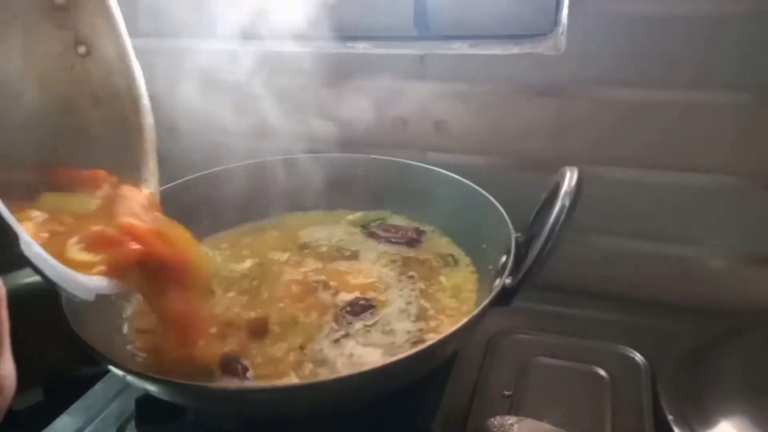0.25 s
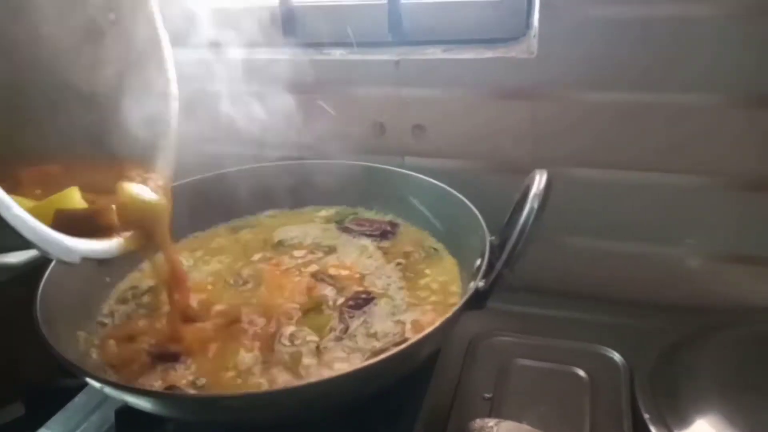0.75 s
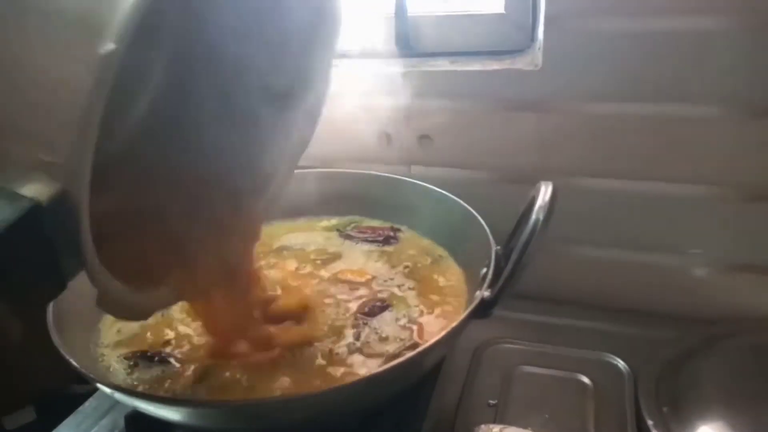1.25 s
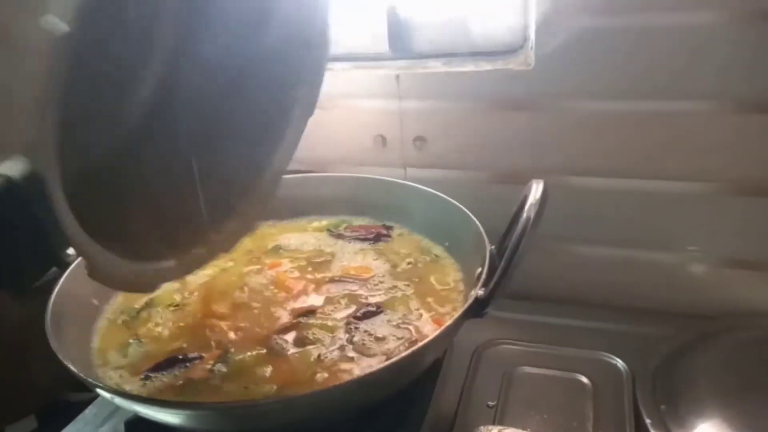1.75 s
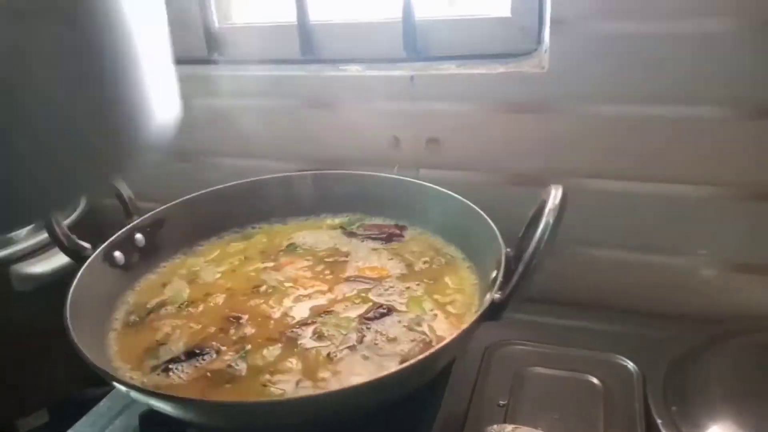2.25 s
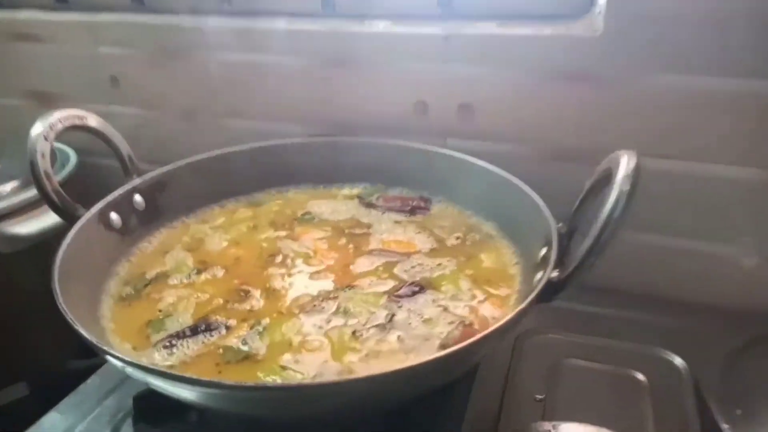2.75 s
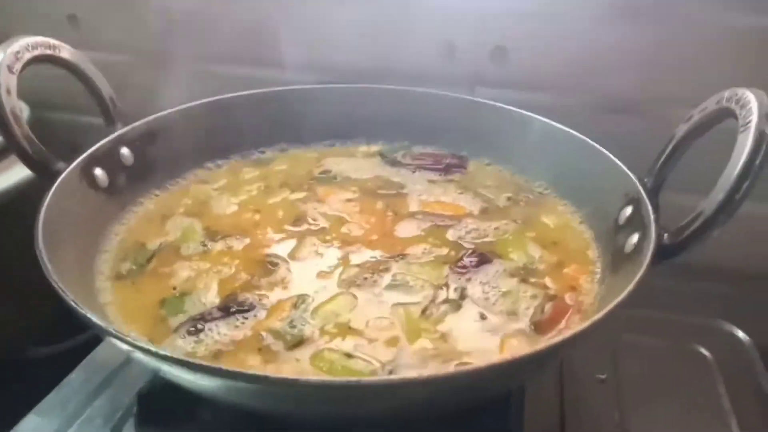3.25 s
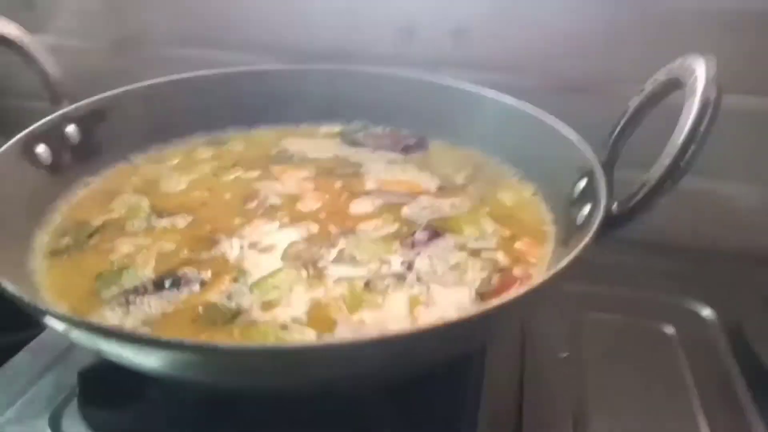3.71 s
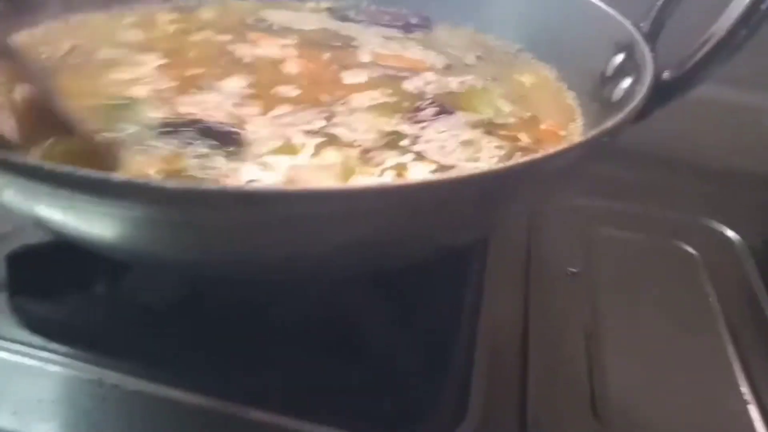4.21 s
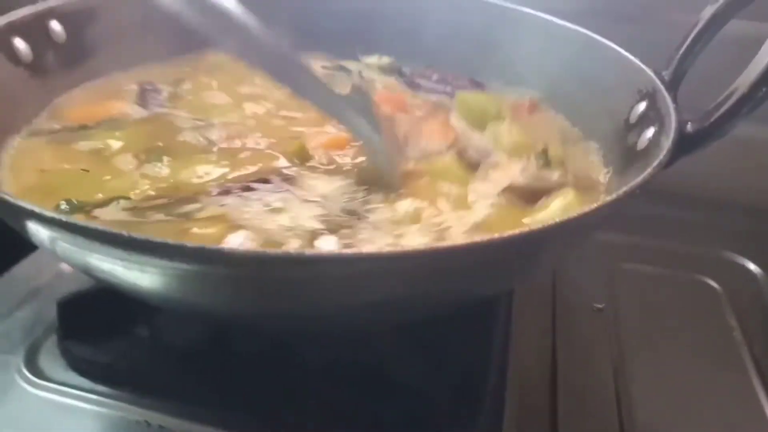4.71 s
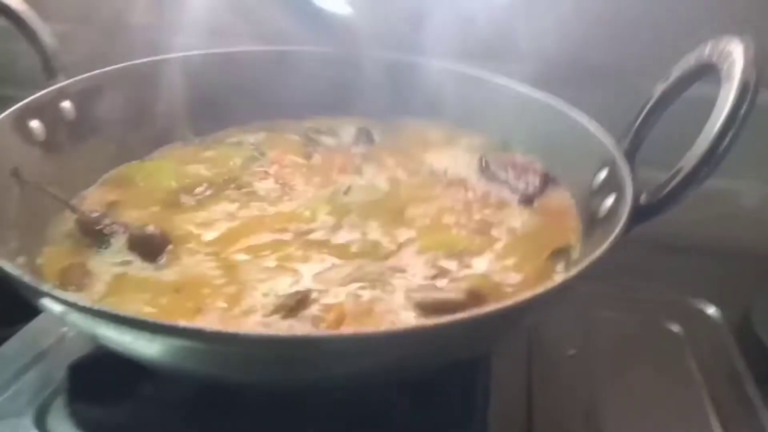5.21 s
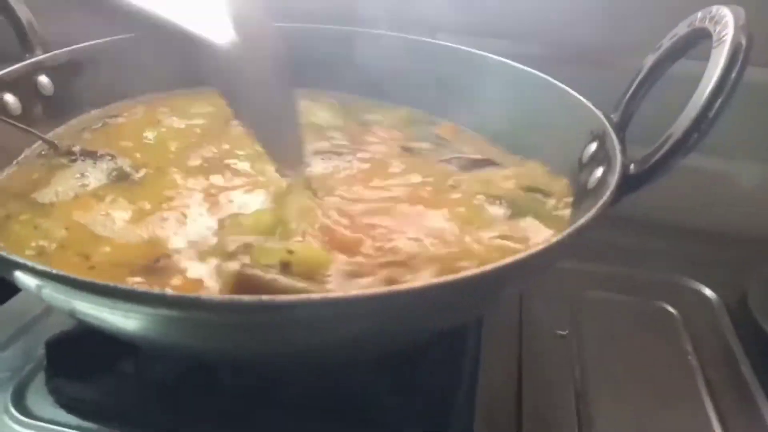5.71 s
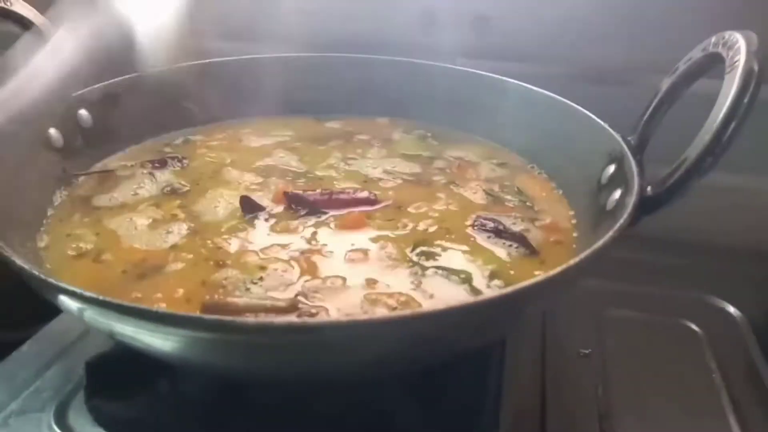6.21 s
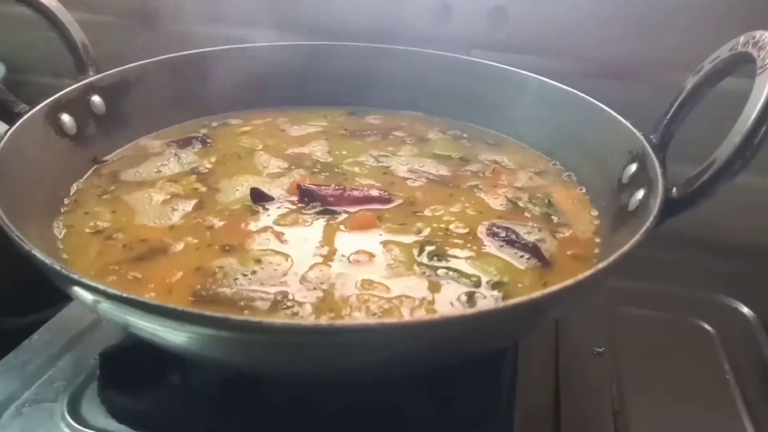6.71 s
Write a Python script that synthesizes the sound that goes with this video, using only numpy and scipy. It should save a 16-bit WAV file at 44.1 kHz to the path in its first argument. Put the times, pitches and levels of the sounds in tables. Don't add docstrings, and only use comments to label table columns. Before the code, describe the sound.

From 0 s a dense, bright sizzle with fine spitting spray surges unevenly as wet food goes into hot oil, swelling near 0.1, 0.55 and 0.9-1.1 s; a light metallic knock sounds at 0.2 s. The frying stays lively to about 1.5 s, then weakens. At 1.86 s the empty pot hits sharply, ringing thinly, with a rough scrape and low counter boom. Assorted metal knocks follow at 2.6-2.8, 3.1, 3.3 and 3.5 s, the last with a short harsh scrape, then a clicky rattle at 3.9 s. From 4.3 to 5.2 s stirring raises softer hissing flares, with dull ladle bumps from 4.6 s and a clearer one at 5.73 s. After 6 s the sizzle almost vanishes, leaving faint simmer, flame rumble and slight humming rubs. Two light ware clinks come at 6.73 and 6.87 s. Close mono phone microphone, small kitchen.

```python
import sys
import numpy as np
from scipy import signal
from scipy.fft import rfft, irfft, next_fast_len
from scipy.io import wavfile

SR = 44100
rng = np.random.default_rng(int(sys.argv[2]) if len(sys.argv) > 2 else 0)


def volts_from_decibels(level):
    exponent = np.asarray(level, float) / 20
    return 10 ** exponent


def wrap_up_sound(samples):
    columns = np.atleast_2d(samples).T
    tamed = np.clip(columns, -1, 1)
    steps = np.round(tamed * 32767).astype(np.int16)
    wavfile.write(sys.argv[1], SR, steps)


N = 306936
TIME_S = np.arange(N) / SR

# pitch_hz, level_db (per Hz); the sizzle has the microphone port's peaks
SIZZLE = [(590, -57.5), (1000, -16), (1060, -39.5), (1130, -15), (1770, -18.5), (2070, -5.5), (2360, -2),
          (3090, -7), (4540, -4.5), (6210, 2.5), (6620, -1.5), (7110, -20.5), (8500, -28.5), (11000, -40.5),
          (18700, -120)]
SPRAY = [(4120, -15.5), (7000, 5.5), (8300, -9.5), (10700, -10.5), (13500, -10), (14200, -6), (14700, 3.5),
         (15700, 1.5), (16400, -9)]
SIMMER = [(88, -30), (150, -5.5), (199, -28), (327, -6.5), (527, -12), (796, -2), (1070, -11), (1380, -11),
          (2000, -2.5), (2600, -9.5), (4400, -120)]
FLAME = [(15, -37), (25, -26), (65, -9), (113, 3), (143, -3.5), (194, -27), (231, -24), (260, -12),
         (340, -27), (570, -120)]
# time_s, level_db
HEAT = [(0, -31.5), (.6, -32), (1.0, -36), (1.1, -33), (1.42, -33), (1.75, -37.5), (2.4, -41), (3.1, -45.5),
        (3.75, -47.5), (4.15, -45), (5.1, -47.5), (5.35, -54.5), (5.55, -57.5), (5.85, -58.5), (6.2, -76.5),
        (6.96, -69)]
# peak_s, level_db, rise_s, fall_s
FLARES = [(.07, -38.5, 0.03, 0.21), (.26, -42, .05, 0.023), (.56, -35, 0.037, 0.17),
          (.87, -36.5, 0.024, 0.076), (1.004, -33.5, 0.01, 0.0072), (1.1, -35, .03, 0.015),
          (4.31, -38, 0.066, 0.098), (4.66, -38.5, .07, 0.11), (4.89, -41.5, 0.092, 0.082),
          (5.2, -47, 0.1, 0.064), (5.74, -54, 0.0098, 0.041)]
# pitch_hz, width_hz, level_db
JUG = (-15.5, 0.45), [(273, 98, 5), (1290, 45, 4.5), (2200, 20, -3), (2440, 17, 0), (2760, 91, -3),
       (3140, 49, -5.5)]
POT_RIM = (-11, 0.8), [(2350, 70, 0), (3463, 38, -3.5), (4590, 51, 1.5), (5490, 62, -0.5), (6040, 45, -7),
           (6154, 70, 3)]
SPOON = (-8, 0.3), [(281, 44, 2), (737, 120, -6), (2016, 57, -6), (2390, 130, -6), (4100, 310, -13),
         (5930, 180, -6)]
BOARD = (-7.5, 0.3), [(280, 31, -1), (613, 56, -5), (1023, 40, -5), (2170, 210, -6), (2332, 33, -2.5),
         (3530, 380, -12), (5500, 260, -8.5), (6270, 390, -17)]
POT_BASE = (-9.5, 0.41), [(510, 66, -1.5), (677, 67, -1), (999, 74, 1.5), (1590, 33, -7), (2303, 34, 1.5),
            (2860, 63, -5.5), (3840, 135, -1), (4380, 84, -7), (5330, 88, -4), (6570, 170, -5)]
SHELF = (-5.5, 0.25), [(104, 31, 4.5), (1460, 85, -6), (1855, 49, -10), (2500, 27, -18), (2940, 23, -20),
         (3600, 170, -14), (4000, 34, -17), (4420, 89, -11)]
TIN = (-4, 0.31), [(210, 50, 6), (950, 27, -11), (1463, 130, -2.5), (2023, 26, -5), (2380, 19, -6),
       (2840, 200, -9), (3130, 110, -8), (3360, 33, -10), (3800, 41, -14), (4300, 74, -9)]
CLIP = (-16.5, 0.14), [(1920, 120, -5.5), (3550, 110, -5), (5160, 230, -5), (6060, 210, -2.5),
        (6300, 100, -16)]
BOWL = (-7, 0.28), [(1210, 65, -3), (1440, 72, -2.5), (1546, 45, 1.5), (1970, 81, -4.5), (2200, 84, -3.5),
        (2820, 45, -26), (3540, 150, -7), (4330, 67, -36), (5490, 65, -16), (6300, 63, -35),
        (7650, 56, -38)]
LID = (-12.5, 0.25), [(256, 32, 1), (1480, 98, -5), (1870, 99, -1.5), (2180, 110, -3.5), (3330, 150, -2.5),
       (4070, 130, -3.5), (4740, 96, -9), (6120, 104, -0.5), (7430, 120, -11)]
STRUCK_S = [
    .214,
    1.857,
    2.615,
    2.759,
    3.110,
    3.281,
    3.479,
    3.904,
    6.734,
    6.872,
]
# start_s, strength_db, weight_db, edge_db
CLATTER = [(0.218, -15.5, -18, -3), (0.361, -23.5, -17.5, 7), (0.4545, -24, -26, -11),
           (1.858, -9.5, -29, -8.5), (1.904, -26, -7, 7), (1.968, -30, -2, 6), (2.023, -35, -5, 5),
           (2.5048, -34.5, -5.5, -5), (2.6128, -19.5, -12, 6.5), (2.688, -27.5, -12, -6),
           (2.7578, -19, -7.5, -1), (2.8204, -27, -33, 1), (3.1097, -18, -13.5, -3),
           (3.281, -22, -18.5, -3), (3.481, -17, -7.5, -2), (3.591, -25.5, -32, -11), (3.6663, -33, -44, 2),
           (3.9027, -26, -17.5, 9), (3.9556, -21.5, -23, -8), (3.997, -36, -24, -13),
           (6.735, -19, -25, -39), (6.8685, -37, -20, 4), (6.8755, -22.5, -11, 4)]
# start_s, hold_s, rumble_db, rasp_db, release_db_per_s
DRAG = [
    (1.892, 0.085, -28.5, -21.5, 98),
    (3.505, 0.018, -36, -14.5, 220),
    (3.585, 0.0084, -50, -44, 300),
    (3.655, 0.023, -64, -50, 250),
]
# start_s, level_db, t60_s
BOOMS = [(2.0, -36.5, 0.65), (2.16, -46.5, 0.7), (3.13, -41, 0.42), (3.3, -51, 1.0), (3.5, -39, 0.55),
         (3.63, -48, 0.36), (3.88, -44, 0.44), (6.74, -41.5, 0.53), (6.88, -47, 1.1)]
# start_s, pitch_hz, level_db, t60_s
PINGS = [
    (2.615, 6514, -32, .45),
    (6.874, 11750, -62, .3),
]
# start_s, clack_db, thud_db, knock_db
LADLE = [(4.5733, -24.5, -34, -34.5), (4.775, -29, -40, -30.5), (4.8324, -31, -40, -39.5),
         (5.1, -33, -34.5, -37.5), (5.1772, -36, -45.5, -43), (5.3368, -46, -45, -40.5),
         (5.3967, -46, -56, -56.5), (5.7303, -27, -36.5, -34), (5.9718, -53, -43.5, -40),
         (6.0384, -54, -52, -48.5), (6.1085, -46, -51, -70)]
# pitch_hz, width_hz, level_db
PAN_BELLY = [(305, 41.6, 4.5), (234, 90, -8.5), (427, 160, -13)]
# pitch_hz, width_hz, level_db
PAN_WALL = [(618, 36, 4), (693, 50, 2.5), (925, 96, -9), (1359, 42, -6), (2310, 84, -5.5)]
# start_s, length_s, pitch_hz, width_hz, level_db
RUBS = [(6.08, 0.27, 324, 8, -59.5), (6.384, 0.3, 330, 30, -63.5), (6.088, 0.055, 637, 12, -54.5),
        (6.215, 0.22, 618, 5.4, -60), (6.5, 0.22, 624, 12, -62.5), (6.67, 0.078, 862, 26, -55.5)]
# hit_s, and gain_db
DUCKS_S = [
    1.857,
    3.110,
    3.903,
]
DUCKS_DB = [-12, -3, -6]


def rms_one(x):
    return x / np.sqrt(np.mean(x ** 2) + 1e-20)


def colour(x, spectrum):
    size = next_fast_len(N + 8192)
    hz, level_db = np.transpose(spectrum)
    bin_hz = np.arange(size // 2 + 1) * SR / size
    nepers = np.interp(np.log(bin_hz + 1), np.log(hz), level_db) * np.log(10) / 20
    cepstrum = irfft(nepers, size)
    cepstrum[1:size // 2] *= 2
    cepstrum[size // 2 + 1:] = 0
    return rms_one(irfft(rfft(x, size) * np.exp(rfft(cepstrum)), size)[:N])


def band(x, low_hz, high_hz):
    return rms_one(signal.sosfilt(signal.butter(2, [low_hz, high_hz], "band", fs=SR, output="sos"), x))


def drift(rate_hz):
    r = np.exp(-2 * np.pi * rate_hz / SR)
    noise = rng.standard_normal(N + SR)
    return rms_one(signal.lfilter([1], [1, -2 * r, r * r], noise)[SR:])


def ring(force, hz, t60_s):
    r = volts_from_decibels(-60 / (max(t60_s, .005) * SR))
    w = 2 * np.pi * hz / SR
    return signal.lfilter([0, np.sin(w)], [1, -2 * r * np.cos(w), r * r], force + 1e-18)


def pops(per_s, spread_db, hiss):
    sizes = volts_from_decibels(spread_db * np.minimum(rng.exponential(1, N), 5)) * rng.choice([-1, 1], N)
    return rms_one(sizes * (rng.random(N) < per_s / SR)) + hiss * rng.standard_normal(N)


def vigour():
    power = 0
    for s, db, rise, fall in FLARES:
        spread = np.where(TIME_S < s, rise, fall)
        power = power + volts_from_decibels(2 * db) * np.exp(-((TIME_S - s) / spread) ** 2)
    heat_s, heat_db = np.transpose(HEAT)
    return np.interp(TIME_S, heat_s, heat_db), 10 * np.log10(power + 1e-14)


def frying():
    heat_db, flare_db = vigour()
    boom = booms()
    dry_wall_db = -59
    sizzle_gain = np.sqrt(volts_from_decibels(heat_db) ** 2 + volts_from_decibels(flare_db) ** 2 + volts_from_decibels(dry_wall_db) ** 2)
    steady_spray = volts_from_decibels(-52 + 1.36 * (heat_db + 40))
    flare_spray = volts_from_decibels(-52 + 3 + 1.36 * (flare_db + 40.5))
    spray_gain = np.hypot(steady_spray, flare_spray)
    simmer_gain = np.hypot(volts_from_decibels(-52.5 + 0.57 * (heat_db + 40.5)), volts_from_decibels(-14.5) * boom)
    flame_gain = np.hypot(volts_from_decibels(-53.5 - 0.99 * TIME_S), boom)

    bursts = pops(6000, spread_db=4.5, hiss=2.03)
    droplets = bursts + 1.7 * pops(3000, spread_db=2.5, hiss=0.79)
    bubbles = pops(900, spread_db=3.0, hiss=1.08)
    surge = drift(30)
    sizzle = colour(bursts, SIZZLE) * sizzle_gain * volts_from_decibels(-0.2 + 0.98 * surge + 0.98 * drift(51))
    spray = colour(droplets, SPRAY) * spray_gain * volts_from_decibels(1.4 * surge + 0.43 * drift(30))
    simmer = colour(bubbles, SIMMER) * simmer_gain * volts_from_decibels(1.5 * drift(4.1) + 1.33 * drift(20))
    flame = colour(rng.standard_normal(N), FLAME) * flame_gain * volts_from_decibels(1.5 * drift(4))
    return sizzle + spray + simmer + flame


def microphone_hiss():
    return volts_from_decibels(-88) * band(band(rng.standard_normal(N), 14300, 15900), 14300, 15900)


def clank(s, blow, resonances, snap=1.2, rise=0.00021):
    blow_db, t60 = blow
    t = np.arange(SR // 2) / SR
    snap_shape = np.exp(-t / 0.0013)
    chatter = rng.standard_normal(len(t)) * (volts_from_decibels(-60 * t / t60) + snap * snap_shape) * (1 - np.exp(-t / rise))
    sound = 0
    for hz, width, level_db in resonances:
        r = np.exp(-np.pi * np.clip(2.2 * width, 40, 900) / SR)
        section = [(1 - r * r) / 2, 0, (r * r - 1) / 2, 1, -2 * r * np.cos(2 * np.pi * hz / SR), r * r]
        sound = sound + volts_from_decibels(level_db) * signal.sosfilt([section, section], chatter)
        clean = ring(chatter * snap_shape, hz, 0.76 * t60 * min(1, 60 / width))
        sound = sound + volts_from_decibels(level_db - 36.5) * min(1, hz / 1200) * clean
    top_db = max(row[2] for row in resonances)
    return np.r_[np.zeros(round(s * SR)), volts_from_decibels(blow_db - top_db) * sound, np.zeros(N)][:N]


def ringing_ware():
    vessels = JUG, POT_RIM, SPOON, BOARD, POT_BASE, SHELF, TIN, CLIP, BOWL, LID
    ware = sum(clank(s, *vessel) for s, vessel in zip(STRUCK_S, vessels))
    return signal.sosfilt(signal.butter(5, 8100, fs=SR, output="sos"), ware)


def knocks(rows, t60, tail_db, offsets_db):
    white = pops(4000, spread_db=3.0, hiss=1.0)
    port = colour(white, SIZZLE)
    clack = band(port, 1800, 4000)
    thud = band(band(white, 110, 380), 100, 500)
    knock = band(white, 420, 1600)
    clink = band(port, 4000, 7500)
    edge = band(colour(white, SPRAY), 6500, 14500)
    voices = [clack, thud, knock, clink, edge]
    rises_s, lasts = [.0006, .004, .0015, .0005, .0008], [1.01, 1.6, 1.2, .9, .7]
    out, t = np.zeros(N), np.arange(SR // 2) / SR
    for s, *levels_db in rows:
        i = round(s * SR)
        for voice, level_db, offset_db, rise, last in zip(voices, levels_db, offsets_db, rises_s, lasts):
            crack = np.exp(-(t / (0.0089 * last)) ** 2)
            rattle = volts_from_decibels(tail_db - 60 * t / (t60 * last))
            shape = (1 - np.exp(-t / rise)) * (crack + rattle)
            piece = voice[i:i + len(t)]
            out[i:i + len(t)] += volts_from_decibels(level_db + offset_db) * shape[:len(piece)] * piece
    return out


def clatter():
    blows = [(s, db, db + weight, db + 0.82 * weight, db + 0.37 * edge, db + edge)
             for s, db, weight, edge in CLATTER]
    return knocks(blows, t60=0.34, tail_db=-5, offsets_db=[-15.5, -7.0, -10.5, -13.5, -25.5])


def drag():
    slips = pops(700, spread_db=2.5, hiss=.6)
    rumble = band(band(slips, 185, 1000), 180, 1460)
    rasp = colour(slips, SIZZLE)
    out = 0
    for s, hold, rumble_db, rasp_db, release in DRAG:
        rise_db = 409 * np.maximum(s - TIME_S, 0)
        fall_db = release * np.maximum(TIME_S - s - hold, 0)
        out = out + rumble * volts_from_decibels(rumble_db - 7.5 - rise_db - fall_db)
        out = out + rasp * volts_from_decibels(rasp_db - 14.0 - rise_db - 1.4 * fall_db)
    return out * volts_from_decibels(2.74 * drift(18))


def booms():
    gain = 0
    for s, db, t60 in BOOMS:
        onset = 1 - np.exp(-np.maximum(TIME_S - s, 0) / 0.017)
        gain = gain + volts_from_decibels(db - 60 * np.abs(TIME_S - s) / t60) * onset
    return gain


def spoon_pings():
    out = np.zeros(N)
    for s, hz, db, t60 in PINGS:
        tap = np.exp(-((TIME_S - s - .001) / .0006) ** 2) * np.sin(2 * np.pi * hz * TIME_S)
        out += volts_from_decibels(db) * ring(tap / 23, hz, t60)
    return out


def ladle():
    sound = knocks(LADLE, t60=0.4, tail_db=-11, offsets_db=[-13, -12, -10])
    for s, clack_db, thud_db, knock_db in LADLE:
        sound += clank(s, (thud_db + 25, .17), PAN_BELLY, snap=1.0, rise=0.00064)
        sound += clank(s, (knock_db + 22.5, .12), PAN_WALL, snap=0.35, rise=0.0032)
    for s, length, hz, width, db in RUBS:
        hum = rms_one(ring(rng.standard_normal(N), hz, 2.2 / width))
        sound += hum * volts_from_decibels(db) * np.sin(np.pi * np.clip((TIME_S - s) / length, 0, 1))
    return sound


def scene():
    hits = ringing_ware() + clatter() + drag() + spoon_pings() + ladle()
    hits = signal.sosfilt(signal.butter(3, 75, "high", fs=SR, output="sos"), hits)
    return (frying() + hits + microphone_hiss())[None]


def band_limit(x):
    return signal.sosfilt(signal.butter(12, 17100, fs=SR, output="sos"), x)


def record(dry):
    gain_db = np.zeros(N)
    for s, depth_db in zip(DUCKS_S, DUCKS_DB):
        gain_db += depth_db * (TIME_S < s) * np.clip((TIME_S - s + .016) / .005, 0, 1)
    limited = .4 * np.tanh(dry * volts_from_decibels(gain_db) / .4)
    mix = signal.sosfilt(signal.cheby2(18, 55, 16120, fs=SR, output="sos"), limited)
    return band_limit(mix)


dry = scene()
out = record(dry)
wrap_up_sound(out)
```